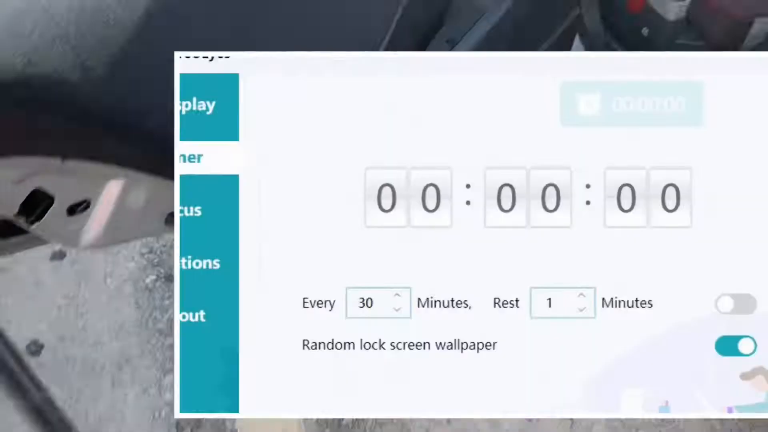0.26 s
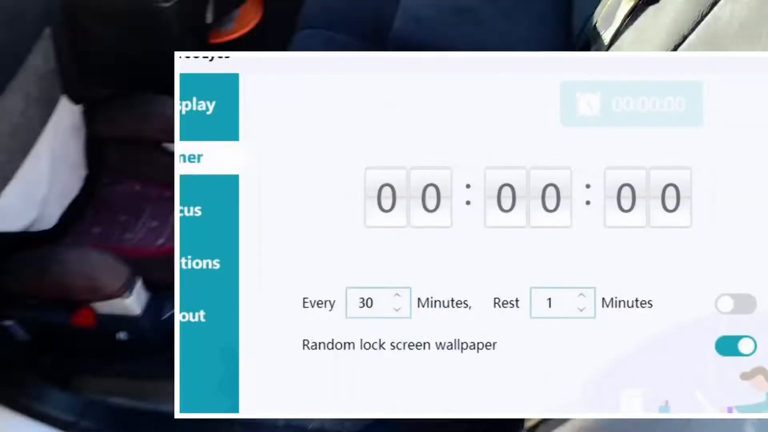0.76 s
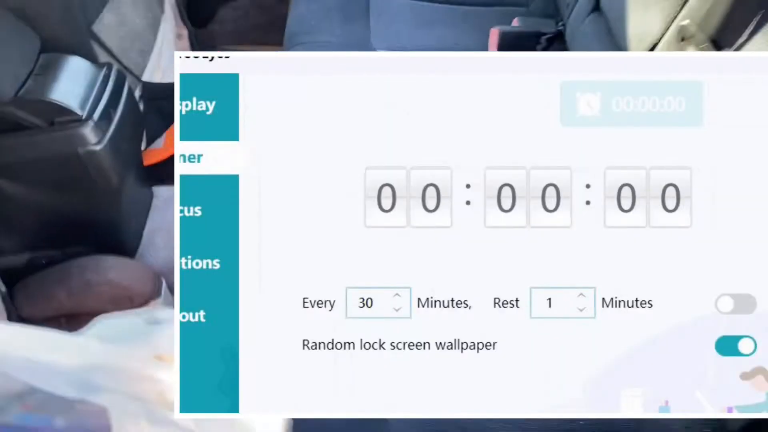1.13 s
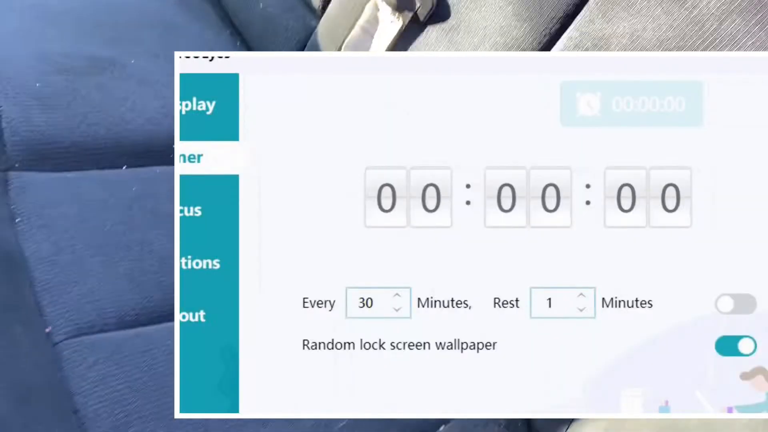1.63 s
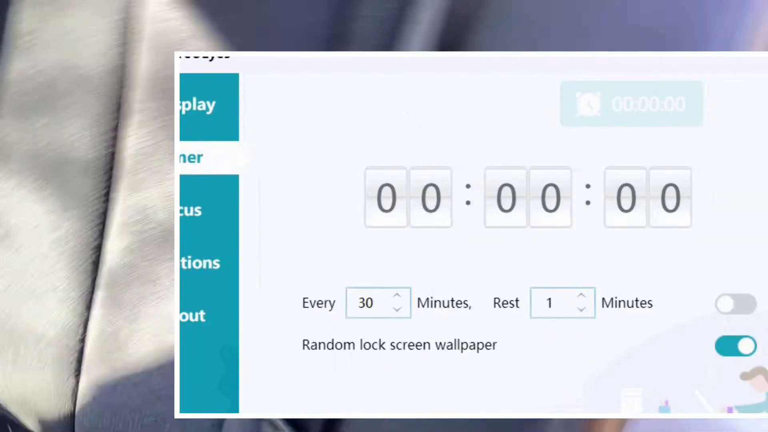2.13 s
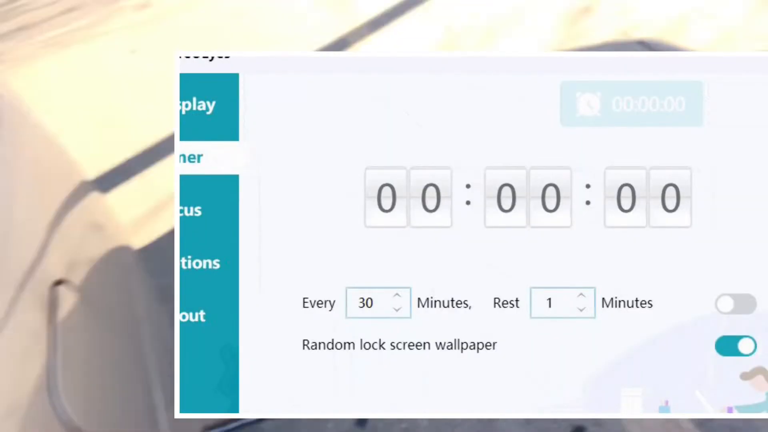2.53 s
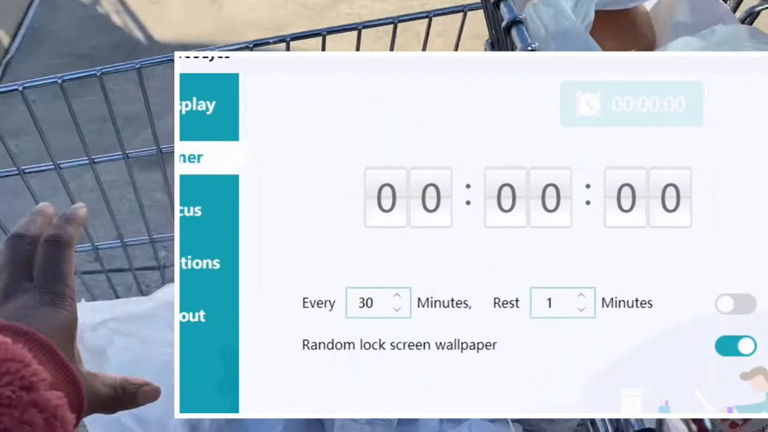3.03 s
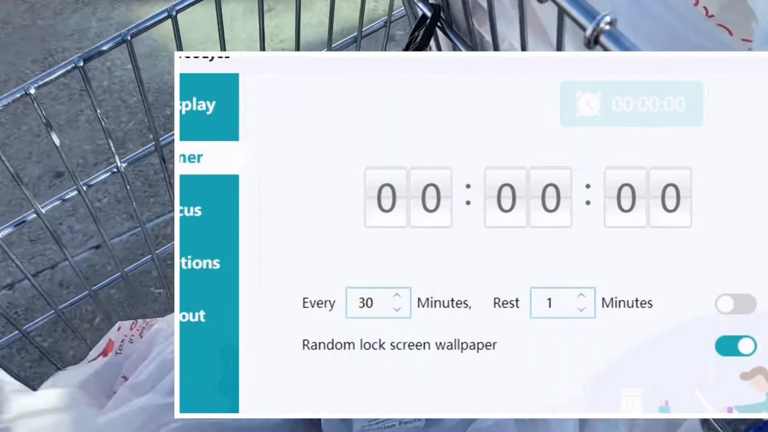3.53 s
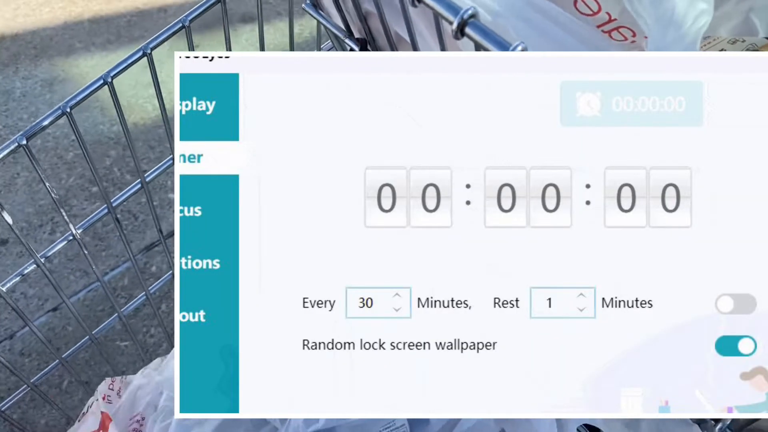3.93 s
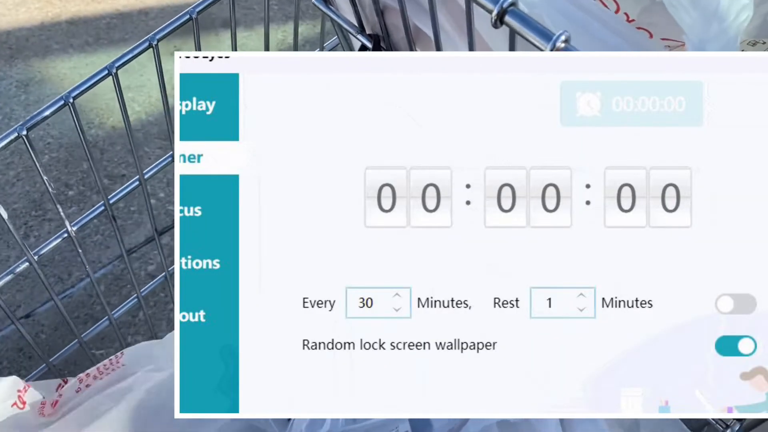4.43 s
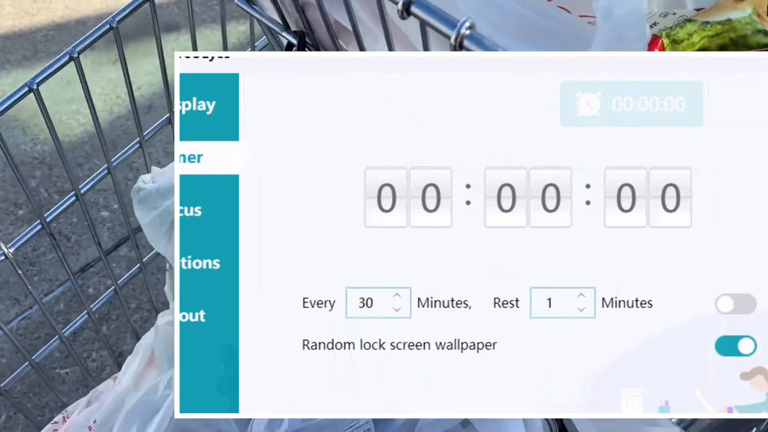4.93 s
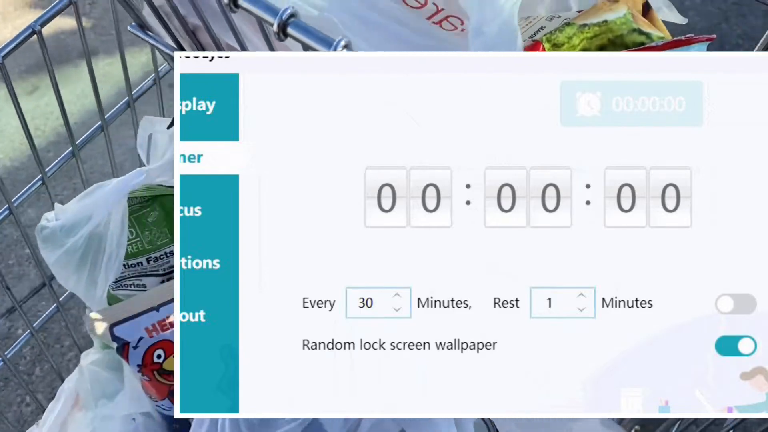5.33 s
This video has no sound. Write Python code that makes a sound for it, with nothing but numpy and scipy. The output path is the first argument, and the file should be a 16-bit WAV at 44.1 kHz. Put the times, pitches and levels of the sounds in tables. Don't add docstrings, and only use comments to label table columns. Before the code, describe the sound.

Open-air stereo, phone held close beside a loaded metal cart on concrete. Two or three deep thumps land within the first 0.3 seconds, with wire hum and bag rustle. From 0.4 to 2.1 seconds plastic crinkles in small uneven squeezes, punctuated by crisp ticks, mostly to the left after 0.6, and a short scraping knock around 1.55. At 2.15 a load lands; a run of dull bumps follows to 2.75, with another firm thump at 2.46, while the bags only settle faintly. A very thin, barely audible squeak sits near 2.0-2.4. From 2.95 the bags are handled again, loudest at 3.46, then brisk near 4.0-4.2 and swelling at the end. Deep wheel thuds continue at 3.15, 3.27, 3.66, 4.0, 4.45, 4.86 and 5.35, with a knock near 5.48. Throughout, soft road wash and a distant, slowly rising engine hum, stronger before 3, with a fan-like drone wavering from 3.2 to 5.

```python
import sys
import numpy as np
from scipy import signal
from scipy.fft import rfft, irfft, next_fast_len
from scipy.io import wavfile
from scipy.ndimage import uniform_filter1d

SR = 44100
rng = np.random.default_rng(int(sys.argv[2]) if len(sys.argv) > 2 else 0)


def voltage_ratio(level):
    return 10 ** (np.asarray(level, float) / 20)


def store_wav(level_fs):
    pcm = np.round(np.clip(np.atleast_2d(level_fs), -1, 1) * 32767)
    wavfile.write(sys.argv[1], SR, pcm.T.astype(np.int16))


N = 246078
TIME = np.arange(N) / SR
SIZE = next_fast_len(N)
HZ = np.fft.rfftfreq(SIZE, 1 / SR)


def unit_rms(x):
    return x / np.sqrt(np.mean(x ** 2))


def curves(table):
    s, *columns = np.transpose(table)
    return [np.interp(TIME, s, c) for c in columns]


def spectrum(points):
    hz, value = np.transpose(points)
    return np.interp(np.log(HZ + 1), np.log(hz), value)


def colour(x, points):
    return unit_rms(irfft(rfft(x, SIZE) * voltage_ratio(spectrum(points)), SIZE)[:N])


def resonance(x, hz, width_hz):
    r = np.exp(-np.pi * max(width_hz, 4.) / SR)
    return unit_rms(signal.lfilter([1], [1, -2 * r * np.cos(2 * np.pi * hz / SR), r ** 2], x))


def walk(rate):
    k = int(SR / rate)
    held = np.repeat(rng.standard_normal(N // k + 1), k)
    return 1.62 * uniform_filter1d(uniform_filter1d(held, k), k)[:N]


def grains(rate, spread_db, smear_s, bed):
    chance = rng.random((2, N))
    snaps = (chance[0] < rate / SR) * voltage_ratio(-spread_db * np.log(1 - chance[1]))
    power = signal.lfilter([1], [1, -np.exp(-1 / (smear_s * SR))], snaps ** 2)
    return np.sqrt(power / power.mean() + bed) * rng.standard_normal(N)


def tone(hz, wobble):
    return np.sqrt(2) * np.sin(2 * np.pi * np.cumsum(hz) / SR + wobble * walk(13))


def swells(rows, rest_db):
    round_top_db = 0.5
    t = TIME[::32]
    power = voltage_ratio(2 * (rest_db + 0 * TIME)[::32])
    for s, db, rise_s, fall_s in rows:
        rising, falling = (s - t) / max(rise_s, .01), (t - s) / max(fall_s, .01)
        down_db = 10 * np.where(t < s, rising, falling)
        power = power + voltage_ratio(2 * (db + round_top_db - np.hypot(down_db, round_top_db)))
    return np.interp(TIME, t, 10 * np.log10(power))


def add(out, s, burst):
    i = int(s * SR)
    out[..., i:i + burst.shape[-1]] += burst[..., :N - i]


# time in seconds, rumble level in dB.
WHEEL_LOAD = [(0.0, -28), (0.5, -29.5), (0.8, -30.5), (1.2, -29), (1.7, -30.5), (2.05, -28.5), (2.3, -18.5),
              (2.65, -23), (2.95, -30), (3.5, -30.5), (4.0, -35), (4.4, -27), (4.9, -31), (5.58, -27)]
# peak in seconds, level in dB, rise and fall in seconds for 10 dB.
SEAMS = [(.28, -22, 0.053, 0.18), (1.21, -32, 0.058, 0), (1.55, -19.5, 0.034, 0),
         (3.15, -24.5, 0.036, 0.27), (3.67, -19, 0.047, 0), (3.86, -20.5, 0.036, 0.14),
         (4.02, -17.5, 0.016, 0.11), (4.2, -21.5, 0.085, 0), (4.62, -21, 0.075, 0),
         (4.88, -23, 0.017, -0.13), (5.25, -31, .05, -1.5)]
# peak in seconds, level in dB, rise and fall in seconds for 10 dB.
LOADINGS = [
    (.79, -40, 0.08, -1.5),
    (1.21, -31.5, 0.049, 0),
    (2.12, -29.5, 0.047, 0.13),
    (2.46, -30, 0.2, 0.23),
    (2.95, -35, 0.18, 0.5),
    (4.62, -36, .08, 1),
]
# frequency in Hz, level in dB.
RUMBLE_COLOUR = [(20, -40.5), (35, -12.5), (55, 0), (80, 3), (110, 1), (140, 2), (200, -47), (400, -83.5)]
# frequency in Hz, level in dB.
BOOM_COLOUR = [(60, -55), (120, 1), (170, 3), (250, 0.5), (350, -10.5), (500, -23.5), (1000, -56.5)]
# frequency in Hz, width in Hz, level in dB.
BASKET = [(350, 4, 2.5), (430, 37, 1.5), (579, 36, -6.5), (663, 23, -4.5), (784, 13, -12), (890, 14, -12.5),
          (1000, 4.6, -15.5)]
# time in seconds, wash level in dB, tyre hiss level in dB.
ROAD = [(0, -37.5, -61), (.14, -39.5, -57), (.3, -41, -50), (.43, -42, -45), (.6, -44, -48),
        (.75, -44, -52), (1.2, -43, -54), (1.75, -38.5, -52.5), (2.05, -45.5, -48), (2.3, -39.5, -50),
        (2.5, -40, -46.5), (2.8, -40.5, -49), (3.3, -38.5, -49), (3.7, -39, -47.5), (4.6, -39, -46),
        (5.58, -40, -44.5)]
# frequency in Hz, level in dB.
WASH_COLOUR = [(150, -25), (300, -2.5), (500, -1.5), (750, -9.5), (1200, -38.5), (3000, -72.5)]
# frequency in Hz, level in dB.
HISS_COLOUR = [(300, -32.5), (700, -6), (900, -1), (1300, -4.5), (2200, -13), (4000, -27), (8000, -46),
               (16000, -70)]


def rolling():
    rumble_db = swells(SEAMS, curves(WHEEL_LOAD)[0])
    boom_db = swells(LOADINGS, -37.5 + 0.14 * (rumble_db + 29.0))
    wash_db, hiss_db = curves(ROAD)
    rumble = voltage_ratio(rumble_db + 1.0) * colour(grains(80, 1.0, .012, bed=3.0), RUMBLE_COLOUR)
    boom = voltage_ratio(boom_db + 3.0) * colour(grains(120, 1.5, .006, bed=2.5), BOOM_COLOUR)
    grit = grains(500, 1.5, .003, bed=3.0)
    wires = sum(voltage_ratio(db + 6.8 * walk(8)) * resonance(grit, hz, width_hz) for hz, width_hz, db in BASKET)
    wash = voltage_ratio(0.87 * walk(12)) * colour(grit, WASH_COLOUR) + voltage_ratio(-7.5) * unit_rms(wires)
    hiss = voltage_ratio(hiss_db + 3.5 + 1.55 * walk(15)) * colour(grit, HISS_COLOUR)
    return rumble + boom + voltage_ratio(wash_db + 1.0) * wash + hiss


# start in
# seconds, peak in dB, ring in Hz, ring time in seconds.
THUMPS = [(0.251, -14, 107, 0.092), (.42, -30, 840, 0.034), (.598, -34, 1400, 0.034),
          (.94, -40, 1160, 0.039), (1.185, -43, 1500, 0.025), (1.186, -27.5, 700, 0.034),
          (1.203, -36, 900, 0.028), (1.534, -30, 3520, 0.02), (1.537, -32.5, 1000, .08),
          (1.545, -30, 526, .08), (1.566, -25.5, 376, 0.065), (1.524, -30, 1000, 0.022),
          (1.563, -32.5, 2180, 0.032), (1.581, -29.5, 3100, 0.02), (2.129, -41, 2090, 0.035),
          (2.132, -35, 906.4, 0.054), (2.148, -23, 298, 0.064), (2.14, -42, 802, 0.46),
          (2.228, -38, 350, 0.038), (2.286, -38, 398, 0.042), (2.461, -16, 290, 0.044),
          (2.463, -25, 430, 0.051), (2.8638, -24, 850, 0.016), (3.468, -30, 430, 0.12),
          (4.472, -29, 453.9, 0.05), (5.178, -35.5, 1000, 0.14), (5.18, -37.5, 1856, 0.12),
          (5.477, -18.5, 284, 0.11),
          (.005, -30, 109, 0.082), (0.091, -19, 106, 0.075), (0.107, -27, 190, 0.042),
         (0.244, -12, 121, 0.18), (2.151, -12, 241, 0.04), (2.212, -20, 170, 0.054), (2.253, -22, 175, .05),
         (2.314, -22, 82.4, 0.22), (2.344, -18, 85, 0.13), (2.385, -30, 200, .04),
         (2.4592, -12.5, 200, 0.042), (2.471, -23.5, 100, 0.092), (2.546, -24.5, 85, .1),
         (2.6, -23, 75, .15), (2.681, -23, 65, .2), (2.752, -20, 214, 0.097), (2.986, -26.5, 109, 0.072),
         (3.15, -13.5, 81, 0.22), (3.271, -12, 67, 0.3), (3.42, -17.5, 109, 0.24),
         (3.658, -13, 100.5, 0.16), (3.74, -19, 135, .1), (3.843, -26, 134, .12), (4.007, -17, 99, 0.14),
         (4.17, -21, 90.5, 0.11), (4.446, -18, 110, 0.11), (4.581, -18, 136, 0.13), (4.856, -16, 62, .15),
         (5.345, -17, 64, 0.34), (5.499, -19.5, 142, 0.1),
          (.03, -34, 549, .1), (0.034, -47, 960, 0.053), (.11, -38.5, 675, 0.1), (0.16, -38, 490, 0.12),
         (.21, -36, 541, 0.23), (.08, -39.5, 2156, 0.064), (1.295, -44, 1540, 0.018),
         (1.522, -42, 1500, 0.018), (1.2, -50, 1700, 0.029), (2.133, -45.5, 2700, 0.053),
         (2.131, -46, 1400, 0.029), (2.215, -39, 950, .06), (2.265, -33.5, 800, 0.089),
         (2.39, -38.5, 910, 0.074), (2.8, -42, 620, 0.024), (3.79, -38, 1100, .05), (2.864, -46, 1900, .02),
         (2.225, -28, 350, 0.046), (2.4, -25, 250, .06), (2.3, -23, 240, 0.12), (1.85, -31, 355, 0.17),
         (4.96, -30, 440, 0.11), (.15, -33, 350, 0.13), (3.7, -32, 270, .15), (3.8, -31, 290, .1),
         (1.53, -34, 760, .06), (1.57, -37, 1150, 0.042), (4.2, -20, 108, 0.16), (2.461, -19, 240, .04),
         (2.153, -21, 320, .04), (5.2, -42, 7200, .2)]


def thumps():
    out, t = np.zeros(N), np.arange(SR // 4) / SR
    for s, db, hz, ring_s in THUMPS:
        ring_s = max(ring_s, .01)
        shape = (1 - np.exp(-t * hz / .6)) * np.exp(-np.log(1000) * t / ring_s)
        low_hz = max(.55 * hz, hz - 40 / ring_s)
        high_hz = min(1.6 * hz, hz + 30 / ring_s, max(4400, 1.05 * hz))
        band = signal.butter(3, (low_hz, high_hz), "band", fs=SR, output="sos")
        puff = unit_rms(signal.sosfilt(band, rng.standard_normal(len(t))))
        ring = np.sin(2 * np.pi * hz * t)
        add(out, s, voltage_ratio(db + 1.0) * shape * (ring + (.18 + hz / 3000) * puff))
    return out


# start in seconds, peak in dB, ring in Hz, treble above peak in dB,
# left minus right in dB.
TICKS = [(0.1633, -29, 3000, -29, -11), (0.379, -31, 6840, -13, -16), (0.5981, -17.5, 3420, -25, 11),
         (0.6404, -19.5, 4240, -9, 10), (0.8839, -35, 6860, 3, 2), (0.9403, -29.5, 2640, -17, 12),
         (1.0243, -23, 5800, 4, 10), (1.1197, -40, 2560, -6, 9.5), (1.293, -23.5, 6750, 5, 12),
         (1.3627, -28, 2600, 7, 10.5), (1.5143, -20.5, 2600, 3.5, 9), (1.8841, -35, 7070, -10, 4),
         (2.1291, -38, 2420, -24, 4), (.9405, -35, 6800, -8, 8), (1.515, -27, 7200, -5, 5),
         (3.594, -30.5, 2380, -16, 14), (3.7259, -29, 4250, -12.5, 4), (1.113, -39, 3200, -12, 7),
         (1.187, -35, 3020, -8, 9), (1.297, -28.5, 2600, -10, 6), (1.368, -30, 2870, -15, 6),
         (1.508, -27, 3000, -20, 5), (1.547, -34, 2600, -20, 10), (3.1483, -28, 3490, -10, 2),
         (4.091, -30.5, 3370, -6, 4), (4.107, -27, 3930, -8, 6), (4.169, -28, 3850, -10, 4),
         (4.5741, -35.5, 5160, -4, -2)]
# start in seconds, peak in dB.
SPITS = [(2.2166, -40.5), (2.2727, -47), (2.2847, -48), (2.356, -52), (2.393, -47), (2.4094, -49.5),
         (2.467, -41), (2.5072, -51), (2.5701, -52), (2.8399, -48)]


def ticks():
    out, t = np.zeros((2, N)), np.arange(1500) / SR
    high = signal.butter(4, 7000, "high", fs=SR, output="sos")
    mid = signal.butter(3, (1500, 6800), "band", fs=SR, output="sos")
    snap = 2.6 * (1 - np.exp(-t / 0.00032)) * (np.exp(-t / 0.00043) + 0.079 * np.exp(-t / 0.0093))
    for s, db, hz, top_db, pan_db in TICKS:
        noise = rng.standard_normal((2, len(t)))
        ring = .35 * np.sin(2 * np.pi * hz * t) * np.exp(-t / .0015)
        edges_hz = (max(.42 * hz, 1500), min(1.8 * hz, 6600))
        around = signal.butter(3, edges_hz, "band", fs=SR, output="sos")
        click = 3.4 * (t == t[24])
        crack = 1.37 * signal.sosfilt(around, 0.73 * noise[0] * snap + click)
        spit = voltage_ratio(top_db - 3.5) * signal.sosfilt(high, noise[1] * snap)
        sides_db = np.array([[pan_db], [-pan_db]]) / 2
        add(out, s, voltage_ratio(db - 1.5 + sides_db) * (ring + crack + spit))
    for s, db in SPITS:
        for share, band in ((0.93, high), (.3, mid)):
            noise = rng.standard_normal((2, len(t))) * np.exp(-t / 0.0014)
            add(out, s, voltage_ratio(db + 3.5) * share * signal.sosfilt(band, noise))
    return out


HELD_S = [
    (0, 2.149),
    (2.937, 5.58),
]
# peak in seconds, level in dB, rise and fall in seconds
# for 10 dB, dull body above peak in dB.
SQUEEZES = [(.0, -47.5, 0.018, 0.08, 6.5), (.082, -43, 0.091, 0.07, 4), (.165, -56, .04, 0.1, 13),
            (.3, -58, 0.092, -0.5, -8), (.385, -55, 0.072, 0, -4), (.58, -46, 0.31, 0.14, 3),
            (.72, -52.5, 0.064, 0.2, -14), (.78, -51, .05, 0, -9), (.838, -49.5, 0.06, -0.04, -11),
            (.906, -44, 0.022, 0.07, -3.5), (1.032, -45, 0.031, 0.06, -1), (1.085, -49.5, .03, -0.05, -6),
            (1.14, -59.5, .04, 0.3, -6), (1.192, -57.5, .03, -0.4, -2), (1.297, -45.5, 0.058, .05, -1),
            (1.425, -49, 0.043, 0.14, -19), (1.555, -43.5, 0.08, 0.06, 4), (1.72, -46, 0.07, .15, 2.5),
            (1.79, -43.5, 0.18, .05, -2.5), (2.12, -52, 0.32, -0.25, -2),
            (2.95, -55, .05, 0, 3), (3.172, -43, 0.25, 0.04, -4.5), (3.281, -45.5, 0.16, 0.02, -4),
              (3.458, -32.5, 0.067, 0.0367, -5), (3.65, -43, 0.067, 0.08, -6), (3.76, -46.5, 0.13, 0.1, -7),
              (3.98, -37, 0.11, 0.06, -6.5), (4.12, -38.5, 0.053, 0.12, -5), (4.175, -40.5, 0.057, 0, -11),
              (4.27, -48, 0.083, 0.03, 1), (4.35, -45.5, 0.064, 0.16, -9), (4.42, -46.5, 0.18, -0.2, -15),
              (4.488, -56, 0.047, 0.9, -10), (4.594, -46, 0.033, 0.1, -11), (4.66, -54.5, 0.066, 1, -9),
              (4.767, -45.5, 0.092, 0, -2), (4.891, -50.5, 0.049, 0.5, -17), (5.15, -46, 0.14, 0.04, -13),
              (5.238, -47, 0.023, 0.1, -6), (5.29, -50, 0.048, .08, -10), (5.39, -46, 0.065, .2, -15),
              (5.48, -43, .08, .04, -5), (5.575, -37.5, 0.1, 0.7, -2)]
# time in seconds, creaking change in dB, rustle of folds in dB.
SETTLE = [(2.15, -19, -66), (2.25, -23, -68), (2.33, -22, -73), (2.4, -18, -67.5), (2.56, -23, -77),
          (2.67, -30, -76), (2.8, -22, -79), (2.93, -18, -74)]
# time in seconds, level in dB.
SCRAPE = [
    (1.5, -78),
    (1.51, -38.5),
    (1.55, -38.5),
    (1.585, -36.5),
    (1.61, -83),
]
# frequency in Hz, level in dB.
CRINKLE_COLOUR = [(1200, -26.5), (2900, -9), (3700, 0), (5500, -1), (7500, -4), (9000, -9), (14000, -8)]
# frequency in Hz, level in dB.
BODY_COLOUR = [(300, -38), (800, 4), (1600, -13), (2400, 0), (3200, -8.5), (5000, -38)]
# frequency in Hz, level in dB.
FILM_COLOUR = [(5000, -36), (7500, -3), (9500, 2.5), (12000, 2.5), (15500, 1.5), (18000, -8)]
# frequency in Hz, level in dB.
FOLDS_COLOUR = [(2500, -20.5), (4000, -1.5), (5000, 2), (6500, -7), (8000, -13), (12000, -30)]
# frequency in Hz, level in dB.
WIRES_COLOUR = [(200, -32), (350, 4.5), (1000, -13), (1500, -21), (2200, 6), (3500, 8), (4500, 2),
                (5500, -18), (16000, -56)]


def bags():
    rows = SQUEEZES
    body_rows = [(s, db + dull_db, rise_s, fall_s) for s, db, rise_s, fall_s, dull_db in rows]
    crinkle_db = swells([row[:-1] for row in rows], -68)
    body_db = swells(body_rows, -65.5)
    film_db = -49 + 1.17 * (crinkle_db + 48)
    held = (TIME < HELD_S[0][1]) | (TIME > HELD_S[1][0])
    creases = grains(1500, 2.72, 0.0021, bed=0.88)
    sound = voltage_ratio(crinkle_db + 4.0) * colour(creases, CRINKLE_COLOUR)
    sound += voltage_ratio(body_db - 1.0) * colour(creases, BODY_COLOUR)
    sound += voltage_ratio(film_db + 5.0) * colour(creases, FILM_COLOUR)
    scrape = voltage_ratio(curves(SCRAPE)[0]) * colour(grains(430, 4.1, .002, bed=.6), WIRES_COLOUR)
    under_db, folds_db = curves(SETTLE)
    stir = walk(40)
    folds = ~held * voltage_ratio(folds_db + 3.0 * stir) * colour(creases, FOLDS_COLOUR)
    grip = uniform_filter1d(np.where(held, 1., voltage_ratio(under_db)), 200)
    return grip * (voltage_ratio(1.0 * stir) * sound + scrape) + folds


# time in seconds, pitch in Hz, level in dB.
SQUEAK = [
    (1.85, 6620, -90),
    (1.95, 6608, -69),
    (2.2, 6504, -69.5),
    (2.38, 6600, -76.5),
    (2.45, 6594, -94),
]


def axle_squeak():
    hz, db = curves(SQUEAK)
    return voltage_ratio(db - 1.5 + 5.0 * walk(39.8)) * tone(hz, wobble=9.4) * (db > -89)


# time in seconds, firing rate in Hz, level in dB.
ENGINE = [(0.0, 113.7, -30), (0.3, 116.4, -24.5), (0.48, 115.6, -22), (0.62, 117.9, -23.5),
          (0.85, 119.2, -19), (1.15, 122.3, -22.5), (1.7, 126.3, -21), (1.92, 126.5, -18.5),
          (2.5, 129.2, -19.5), (2.7, 130, -18), (3.1, 131.8, -28), (3.5, 132, -28.5), (3.85, 133.3, -25.5),
          (4.1, 133.5, -43.5), (4.35, 134.9, -28), (4.63, 135.8, -29.5), (4.8, 136.5, -48),
          (5.58, 139, -38)]
# time in seconds, depth in dB, half length in seconds.
ENGINE_LULLS = [(0.212, -20, 0.039), (0.395, -16, 0.046), (1.862, -18, 0.055), (3.233, -10.5, 0.097),
                (3.6, -16, 0.074), (1.617, -11, 0.034), (2.32, -3.5, 0.046), (2.762, -15, 0.062),
                (2.96, -15.5, 0.061)]
# multiple of firing rate, best pitch in Hz, width in Hz,
# level there in dB over the first.
EXHAUST = [
    (2, 249.5, 8, -13),
    (3, 373, 6, -20),
]
# time in seconds, level in dB.
FAN_DRONE = [(.6, -48), (.8, -38.5), (1.0, -51), (1.9, -41), (2.05, -47), (2.6, -37), (3.1, -39.5),
             (3.25, -33), (3.42, -29.5), (3.51, -40), (3.6, -30.5), (3.76, -28.5), (3.82, -51), (3.94, -33),
             (4.2, -29), (4.75, -29), (5.09, -36), (5.2, -44)]


def engines():
    hz, db = curves(ENGINE)
    for s, depth_db, half_s in ENGINE_LULLS:
        db = db + depth_db * np.clip(1 - abs(TIME - s) / half_s, 0, 1)
    stack = voltage_ratio(db + 1.0 * walk(14)) * tone(hz, wobble=.2)
    for k, best_hz, width_hz, under_db in EXHAUST:
        ring_db = np.maximum(-3 * ((k * hz - best_hz) / (width_hz / 2)) ** 2, -20)
        stack += voltage_ratio(db + under_db + ring_db + 2.0 * walk(8)) * tone(k * hz, wobble=.25)
    turns_per_firing = 1.642
    drone = voltage_ratio(curves(FAN_DRONE)[0] + 1.5 * walk(14)) * tone(turns_per_firing * hz, wobble=0.42)
    return stack + drone


# frequency in Hz, left's lead in radians.
PORT_PHASE = [(0, -1), (260, 0.8), (900, 2), (2150, 7.5), (6800, 6.5), (15400, -6.5), (22050, -20.5)]
# frequency in Hz, likeness 0-1 and left minus right in dB with the
# source aside, likeness 0-1 and left minus right in dB with it ahead.
PORTS = [(61, 0.97, -0.5, 0.87, 0), (260, 0.63, -1.5, 0.67, -0.5), (600, 0.5, 1, 0.86, 1),
         (1400, 0.16, 1, 0.035, 3.5), (2660, 0.66, 2.5, 0.63, 6), (3350, 0.99, 3.5, 0.93, 1),
         (4030, 0.62, 3, 1, 2.5), (5800, 0.16, 4.5, 0.31, 4.5), (6800, 1, -2, 0.95, -1),
         (16000, 1, 0, 0.94, 2.5)]


def ports(source):
    left, other = rfft(source(), SIZE), rfft(source(), SIZE)
    lag = np.exp(-1j * np.interp(HZ, *np.transpose(PORT_PHASE)))
    table, views = np.array(PORTS), []
    for pair in (table[:, 1:3], table[:, 3:5]):
        alike, lean_db = (spectrum(np.c_[table[:, 0], c]) for c in pair.T)
        alike = np.clip(alike, 0, 1)
        right = alike * lag * left + np.sqrt(1 - alike ** 2) * other
        both = np.array([left * voltage_ratio(lean_db / 2), right * voltage_ratio(-lean_db / 2)])
        views.append(irfft(both, SIZE)[:, :N])
    return np.where(TIME < HELD_S[1][0], *views)


def scene():
    around = ports(lambda: rolling() + bags())
    far = engines() + axle_squeak()
    far_right = np.interp(TIME - 0.00031, TIME, far)
    no_subsonic = signal.butter(2, 50, "high", fs=SR, output="sos")
    return around + np.array([far, far_right]) + ticks() + signal.sosfilt(no_subsonic, thumps())


def joint_stereo(x, margin_db, low_hz):
    hz, _, z = signal.stft(np.array([x[0] + x[1], x[0] - x[1]]), SR, nperseg=2048)
    bands = (abs(z[:, :-1]) ** 2).reshape(2, 64, 16, -1).sum(axis=2)
    margin = voltage_ratio(-2 * margin_db + 2.0 * rng.standard_normal(bands.shape))
    weak = np.repeat(bands < bands[::-1] * margin, 16, axis=1)
    z[:, :-1] *= ~(weak & (hz[:-1, None] > low_hz))
    mid, side = signal.istft(z, SR, nperseg=2048)[1][:, :N]
    return np.array([mid + side, mid - side]) / 2


def band_limit(x):
    return signal.sosfilt(signal.butter(12, 17050, fs=SR, output="sos"), x)


def record(dry):
    top = signal.ellip(10, .2, 60, 15750, fs=SR, output="sos")
    mix = joint_stereo(signal.sosfilt(top, dry), margin_db=5.5, low_hz=1400)
    return band_limit(mix)


dry = scene()
out = record(dry)
store_wav(out)
```